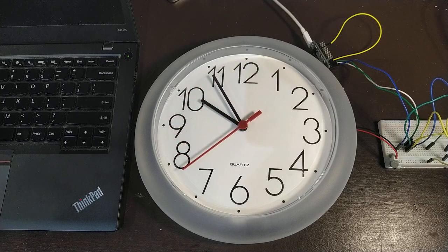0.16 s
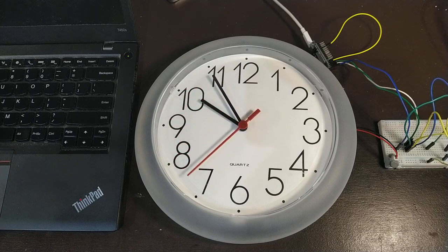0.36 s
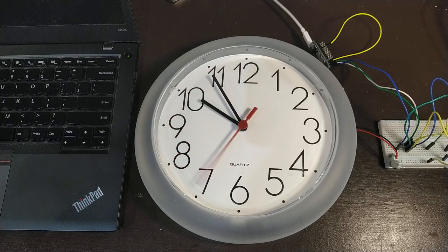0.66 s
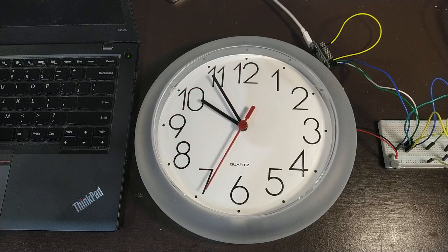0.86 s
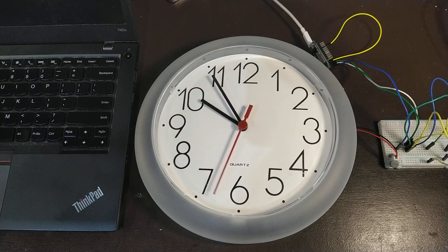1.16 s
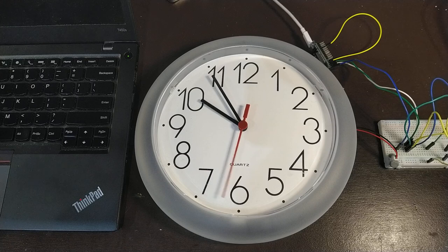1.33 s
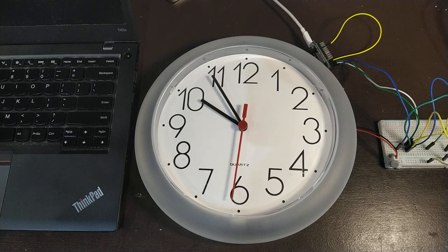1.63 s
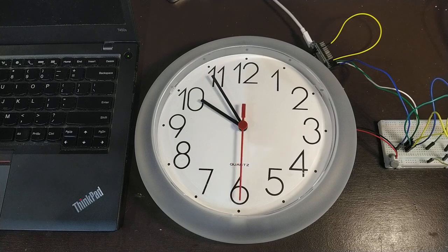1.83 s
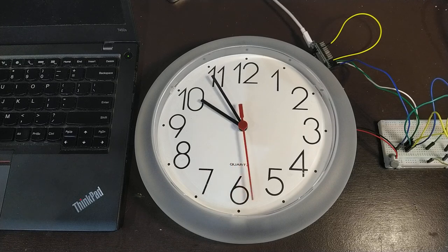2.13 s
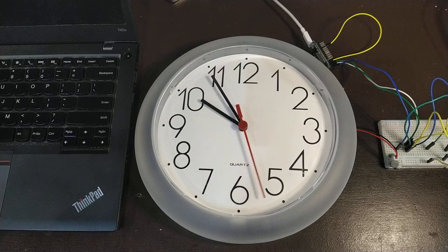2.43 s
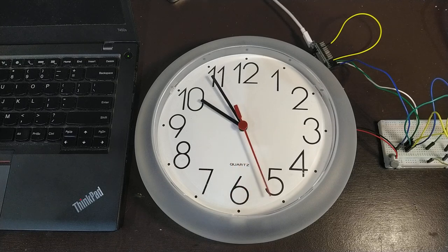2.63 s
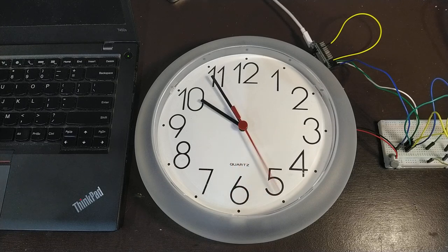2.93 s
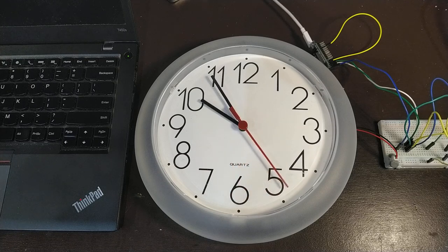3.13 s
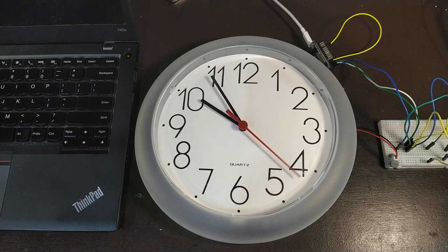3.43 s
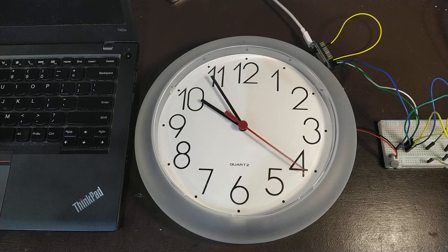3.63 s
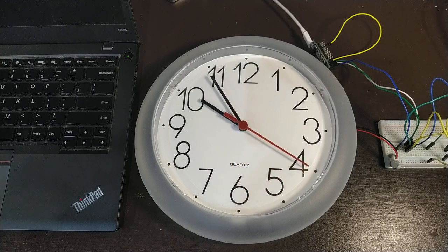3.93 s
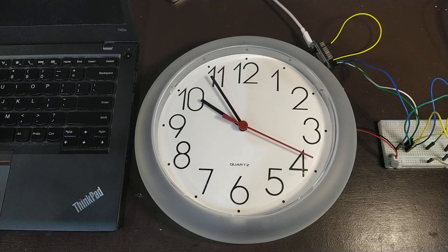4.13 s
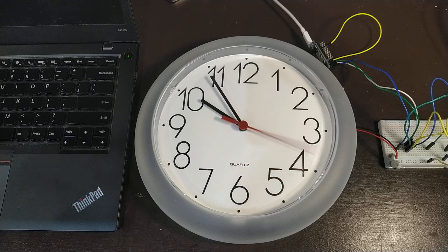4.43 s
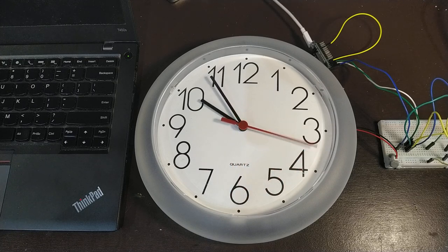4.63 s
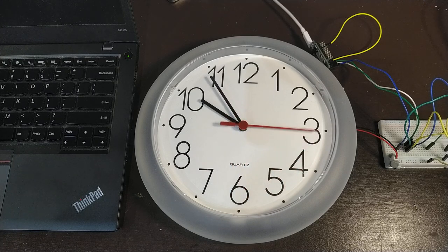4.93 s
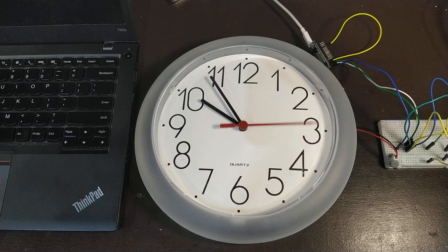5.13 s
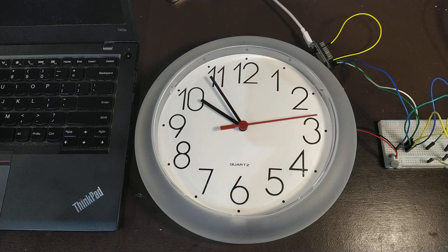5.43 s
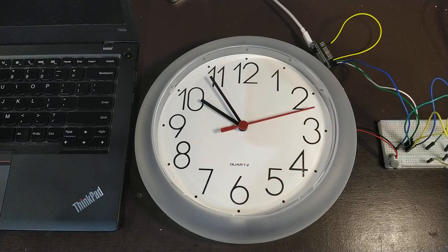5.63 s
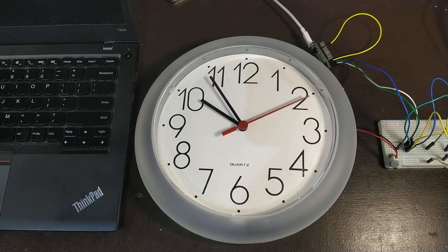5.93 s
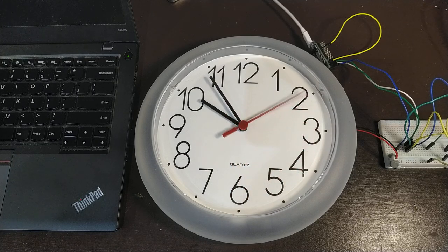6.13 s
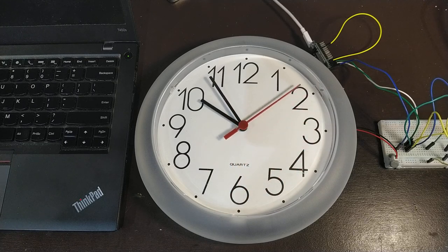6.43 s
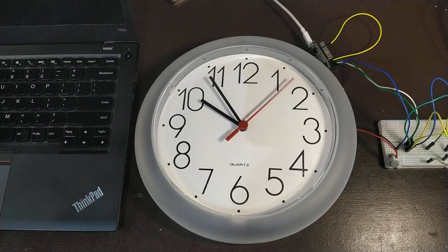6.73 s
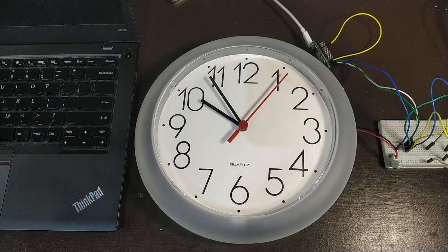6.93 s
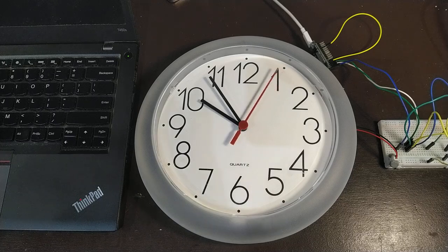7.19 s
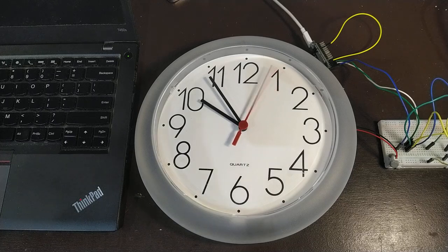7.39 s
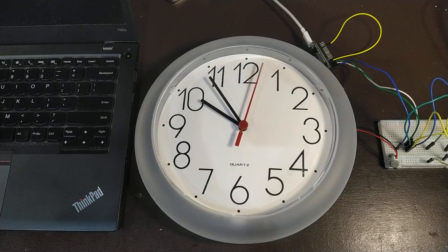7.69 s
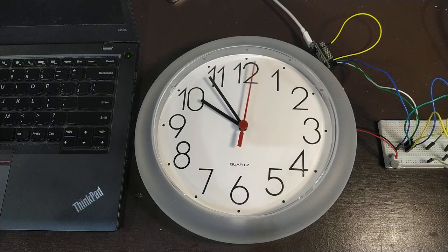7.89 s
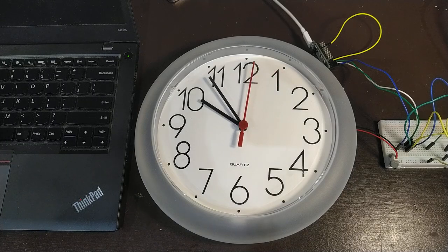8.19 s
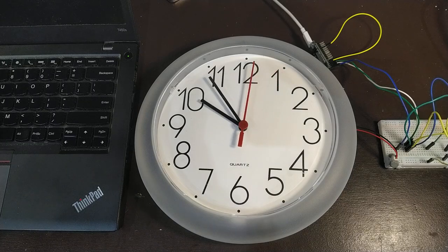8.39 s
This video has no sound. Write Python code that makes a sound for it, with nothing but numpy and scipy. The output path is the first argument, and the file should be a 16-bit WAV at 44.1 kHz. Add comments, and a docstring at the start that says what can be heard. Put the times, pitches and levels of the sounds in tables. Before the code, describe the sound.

A wall clock's motor ticks fast and evenly, nearly five rattly plastic clicks a second, over a low room rumble, then stops just before the end.

```python
"""Quartz wall clock on a desk

The clock lies in a small room; its stepper motor makes nearly five steps a second and stops just before 8 s.
Each step is a volley of clicks: the rotor snaps round, overshoots and rattles the loose plastic gears in the case.
Noise bursts and clumped noise excite resonances of housing, dial and case; short pings are added directly.
Diffuse reverberation follows. Shaped noise makes the low rumble, a hum that swells now and then, and one soft swish;
a faint sine whines throughout."""
import sys
import numpy as np
from scipy import signal
from scipy.fft import rfft, irfft, next_fast_len
from scipy.io import wavfile

SR = 44100
rng = np.random.default_rng(int(sys.argv[2]) if len(sys.argv) > 2 else 0)


def log_audio(samples):
    """Write samples as a 16-bit WAV file to the path given in sys.argv[1]."""
    # one column per channel
    frames = np.atleast_2d(samples).T
    # limit to full scale, then quantise
    limited = np.clip(frames, -1, 1)
    pcm = np.round(limited * 32767).astype(np.int16)
    wavfile.write(sys.argv[1], SR, pcm)


N = 377055

# looseness of the gear train, greatest while the second hand swings down through six: t/s, rattle level/dB
GEAR_SLACK = [(0, -0.5), (1, 0), (1.8, 1), (2.6, -0.5), (3.4, -1.5), (4.4, -1.5), (8, -1.5)]


def amp(db):
    """Level definition: an amplitude ratio is 10 to the power dB/20."""
    return 10 ** (np.asarray(db) / 20)


def unit(x):
    """Normalisation of mean power: scale to rms 1."""
    return x / np.sqrt(np.mean(x ** 2) + 1e-20)


def along(points, hz):
    """Logarithmic frequency scale: read (f/Hz, value) points by straight lines over log frequency."""
    f, value = np.transpose(points)
    return np.interp(np.log(hz + 1), np.log(f), value)


def filtered(x, response):
    """Linear filtering: the spectrum of x is multiplied by a response of frequency."""
    size = next_fast_len(N + SR // 2)  # zero padding keeps the filter's tail from wrapping round
    hz = np.fft.rfftfreq(size, 1 / SR)
    return irfft(rfft(x, size) * response(hz), size)[:N]


def noise(spectrum):
    """Spectral shaping: white noise takes the given spectrum and is scaled to rms 1."""
    white = rng.standard_normal(N)
    return unit(filtered(white, lambda hz: amp(along(spectrum, hz))))


def resonate(x, modes):
    """Modal resonance: steep-sided peaks add in power, with a mean power gain of 1."""
    def response(f):
        power = sum((amp(db) / (1 + (2 * (f - hz) / width) ** 2)) ** 2 for hz, width, db in modes)
        return np.sqrt(power / np.mean(power))
    return filtered(x, response)


def background(rumble_db=-49.0, air_db=-67.5, whine_db=-95.0):
    """Superposition of lasting sources: ventilation rumble, drifting narrow-band hum, thin hiss, electronic whine."""
    # relative spectrum of the rumble: f/Hz, density level/dB
    rumble_spectrum = [(12, 0.5), (28, 1.5), (43, -0.5), (54, -12.5), (78, -5), (100, -12.5), (125, -15.5),
                       (180, -24), (260, -32), (400, -59), (800, -100)]
    # slow change of the rumble: t/s, level/dB
    rumble_swell = [(0, 0), (1.9, 0.5), (2.3, -1), (3.2, 2), (3.7, 0), (5.3, -1), (6.3, 0.1), (8.55, -.3)]
    # the hum's narrow band: f/Hz, width/Hz, relative level/dB
    hum_band = [(147.6, 33, 0)]
    # the hum swells now and then: t/s, level/dB
    hum_drift = [(0, -75.5), (4.2, -70.5), (4.5, -64.5), (4.9, -67.5), (5.1, -78), (8, -72), (8.2, -59.5),
                 (8.35, -75), (8.55, -72)]
    # relative spectrum of the hiss: f/Hz, density level/dB
    air_spectrum = [(120, -23), (200, -8.5), (256, -10), (349, -12.5), (646, -22), (1130, -27),
                    (1610, -32.5), (3760, -36), (4060, -36), (8000, -38.5), (10400, -81), (17600, -120)]
    t = np.arange(N) / SR
    rumble = amp(rumble_db + np.interp(t, *np.transpose(rumble_swell))) * noise(rumble_spectrum)
    hum = amp(np.interp(t, *np.transpose(hum_drift))) * unit(resonate(rng.standard_normal(N), hum_band))
    air = amp(air_db) * noise(air_spectrum)
    whine_hz = 3925
    whine = amp(whine_db) * np.sqrt(2) * np.sin(2 * np.pi * whine_hz * t)  # root 2: the level is an rms level
    return rumble + hum + air + whine


def contacts(count=7):
    """Damped rebound: each step ticks, strikes and rebounds, then swings to rest ever more weakly and unevenly.

    Returns rows of t/s, click level/dB, knock level/dB, the levels still without the clock's gains."""
    # motor steps: strike t/s, rotor's swing to its rebound/s,
    # relative levels of lead-in tick/dB, strike/dB, rebound/dB, knock on the dial/dB
    steps = [(0.053, 0.015, -56.5, -55, -53.5, -53), (0.265, 0.015, -55, -50, -53.5, -53),
             (0.476, 0.017, -59.5, -57, -54, -54.0), (0.699, 0.015, -56, -50, -52, -55),
             (0.897, 0.016, -78, -51.5, -50.5, -54), (1.122, 0.015, -53.5, -48.5, -54, -53.5),
             (1.32, 0.015, -63, -52.5, -49, -54), (1.529, 0.016, -66, -56, -50.5, -54),
             (1.755, 0.016, -55.5, -47.5, -59, -51.5), (1.965, 0.011, -57, -52, -45, -52),
             (2.163, 0.018, -62, -52, -56, -59), (2.386, 0.013, -58.5, -49, -48, -52.0),
             (2.589, 0.012, -68, -52.5, -48, -53.5), (2.792, 0.013, -65, -54, -48.5, -57),
             (3.004, 0.016, -73.5, -53.5, -48.5, -55.5), (3.227, 0.0206, -61, -48.5, -53, -53.5),
             (3.427, 0.014, -81, -53, -50.5, -57.5), (3.653, 0.015, -58, -52, -52.5, -56),
             (3.848, 0.01, -76, -52.5, -54, -56.5), (4.06, 0.015, -65.0, -54, -51, -57),
             (4.27, 0.016, -68.5, -50.5, -57, -57), (4.48, 0.014, -61, -54, -49.5, -57),
             (4.694, 0.015, -58, -51, -53.5, -55.5), (4.903, 0.016, -64, -53.5, -48, -55.5),
             (5.119, 0.015, -61, -52.0, -48, -57), (5.326, 0.0164, -60, -62, -50, -57.5),
             (5.544, 0.014, -60, -49.5, -53, -57), (5.732, 0.015, -79, -55.5, -53, -57.5),
             (5.958, 0.017, -67, -51, -57.5, -55.5), (6.166, 0.016, -64, -51.5, -55.5, -56.5),
             (6.38, 0.017, -69, -49.5, -49, -55.0), (6.591, 0.0162, -57, -55, -50.5, -52.5),
             (6.801, 0.02, -65, -53.0, -52.5, -57), (7.028, 0.017, -52.5, -53.0, -50, -54),
             (7.224, 0.019, -66.0, -49, -56, -54), (7.436, 0.016, -62, -50.0, -53, -55),
             (7.644, 0.016, -75, -48.5, -55, -55.5), (7.846, 0.018, -75, -56, -53, -57.0)]
    # loose gears clack home late after some steps: t/s, relative click level/dB, relative knock level/dB
    clacks = [(0.087, -51.5, -63), (0.124, -54.5, -51.5), (0.294, -50, -55.5), (0.406, -61, -57.5),
              (0.53, -56, -61), (0.567, -57.5, -55), (0.822, -61, -57), (0.962, -54, -56),
              (1.003, -60, -57), (1.207, -57.5, -77), (1.354, -54.5, -58), (1.387, -51, -51),
              (1.554, -47.5, -52.5), (1.656, -59.5, -56.5), (1.808, -49.5, -55.5), (2.028, -55.5, -59),
              (2.188, -45, -50.5), (2.218, -53, -51), (2.267, -60.5, -55), (2.543, -68, -59),
              (2.643, -52, -63), (2.653, -50, -51), (2.819, -58, -50.5), (2.853, -55.5, -55.5),
              (3.251, -55.5, -53.5), (3.338, -58, -58.5), (3.46, -57, -49.5), (3.485, -53, -73),
              (3.781, -64.5, -62.5), (3.91, -51, -54), (4.147, -62, -64), (4.353, -59, -61.5),
              (4.515, -56, -56), (4.748, -55.5, -59), (4.937, -54, -56), (5.15, -51, -52),
              (5.358, -50, -52), (5.435, -65, -57), (5.573, -50.5, -55.5), (5.621, -59, -56),
              (5.763, -51.5, -69), (5.825, -64, -54.5), (6.21, -61, -58), (6.445, -54.5, -62),
              (6.627, -49.5, -53), (6.84, -53, -56), (6.859, -53, -57), (7.066, -62, -64), (7.26, -49, -59),
              (7.361, -63.5, -57), (7.509, -53.5, -53.5), (7.722, -55, -52), (7.877, -51, -52.5),
              (7.892, -52.5, -51), (7.928, -55.5, -51.5)]
    lead_s, lead_knock_db = .018, -13  # the gears take up their play before the strike
    strike_knock_db, rebound_knock_db = 0.5, 0  # these and lead_knock_db are relative to the step's knock
    settle_s, settle_jitter_s = .019, .0035  # spacing of the later swings, and its scatter
    settle_click_db, settle_knock_db = -57.5, -3  # first later swing; its knock is relative to the step's
    click_loss_db, knock_loss_db = 3.0, 2.5  # loss per swing
    click_scatter_db, knock_scatter_db = 2.8, 4.5
    settle_per_slack = 0.53  # slack gears settle louder, dB per dB
    # a random swing this near a listed clack is weakened, so the clack stands in for it
    near_clack_s, near_clack_db = .009, -10

    strike_s, swing_s, lead_in, strike, rebound, knock = np.transpose(steps)
    rows = [(strike_s - lead_s, lead_in, knock + lead_knock_db),
            (strike_s, strike, knock + strike_knock_db),
            (strike_s + swing_s, rebound, knock + rebound_knock_db)]
    chance = rng.standard_normal((len(strike_s), count, 3))
    loose = settle_per_slack * np.interp(strike_s, *np.transpose(GEAR_SLACK))
    clack_s = np.array(clacks)[:, 0]
    at = strike_s + swing_s
    for k in range(count):
        late, harder, deeper = chance[:, k].T
        at = at + settle_s + settle_jitter_s * late
        nearest = np.abs(at[:, None] - clack_s).min(axis=1)
        weakening = near_clack_db * (nearest < near_clack_s)
        click = settle_click_db + loose + weakening - click_loss_db * k + click_scatter_db * harder
        deep = knock + settle_knock_db + weakening - knock_loss_db * k + knock_scatter_db * deeper
        rows.append((at, click, deep))
    return np.vstack([np.hstack(rows).T, clacks])


def place(times, rows):
    """Superposition: sum the rows, each starting at its time."""
    at = np.round(np.abs(times) * SR).astype(int)[:, None] + np.arange(rows.shape[1])
    return np.bincount(at.ravel(), rows.ravel(), N)[:N]


def swell(life, size=4096):
    """Impact envelope: a quick rise that crests after life seconds, then an exponential fall."""
    u = np.arange(size) / SR / life
    return u * u * np.exp(-2 * u)


def scuffs(times, levels_db, life, scatter=.25, tilt_db=2.5, pivot_hz=2500, lean_db=0):
    """Frictional contact: each scuff is a noise burst of tiny impacts, of random length and brightness."""
    length, bright = rng.standard_normal((len(times), 2)).T[:, :, None]
    shape = swell(life * np.exp(scatter * length))
    z = rfft(rng.standard_normal(shape.shape) * shape)
    flat = irfft(z / (np.abs(z) + 1e-12))  # only the phases remain, so every burst is white
    rows = flat * np.sqrt(shape)
    rows *= (amp(levels_db) / np.linalg.norm(rows, axis=1))[:, None]  # level of the energy, before the tilt
    hz = np.fft.rfftfreq(shape.shape[1], 1 / SR)
    octaves = np.clip(np.log2((hz + 1) / pivot_hz), -1, 1)  # the tilt levels off an octave from the pivot
    tilt = amp((lean_db + tilt_db * bright) * octaves)  # both slopes in dB per octave
    return place(times, irfft(rfft(rows) * tilt))


def pings(times, levels_db, pitch_hz, life, scatter):
    """Damped free vibration: the struck gear rings for a few cycles, at a pitch that varies with where it is hit."""
    shape = swell(life)
    hz = pitch_hz * np.exp(scatter * rng.standard_normal((len(times), 1)))
    rows = shape * np.sin(2 * np.pi * hz * np.arange(len(shape)) / SR)
    return place(times, rows * (amp(levels_db) / np.linalg.norm(rows, axis=1))[:, None])


def rattle(times, levels_db, spread, clump_db, clump_rate=220):
    """Random impact excitation: slack parts tremble in clumps that swell and fade around the contacts."""
    at = np.round(np.abs(times) * SR).astype(int)
    power = np.bincount(at, amp(levels_db) ** 2, N)[:N]
    t = np.arange(-SR // 8, SR // 8) / SR
    bell = np.exp(-np.abs(t) / spread)  # spread in seconds, before and after each contact
    motion = np.sqrt(np.abs(signal.fftconvolve(power, bell / bell.sum(), "same")))
    clumps = np.interp(np.arange(N) * clump_rate / SR, np.arange(N), rng.uniform(-1.5, 1, N))
    return motion * unit(rng.standard_normal(N) * amp(clump_db * clumps))


def clock():
    """Source and resonator: contacts click in the housing, rattle the gears, knock the dial, shake the hollow case."""
    # resonances of the movement's plastic housing: f/Hz, width/Hz, relative level/dB
    housing_modes = [(1370, 280, 0), (1748, 247, 1.5), (1867, 170, -6), (2480, 1100, -6.5), (2807, 300, -5),
                     (3114, 293, -1.5), (3647, 270, -5.5), (4300, 2000, -19.5), (5257, 160, -5.5),
                     (5645, 600, -10), (6250, 390, -8.5), (6760, 600, -9), (7324, 290, -10.5),
                     (7760, 520, -12)]
    # resonances of the dial and its cover: f/Hz, width/Hz, relative level/dB
    dial_modes = [(902, 110, -5.5), (1033, 120, -1), (1159, 120, 1), (1241, 60, 0.5), (1341, 88, -2),
                  (1530, 67, -10)]
    # resonances of the hollow case on the desk: f/Hz, width/Hz, relative level/dB
    case_modes = [(291, 40, -1.5), (382.6, 44, -0.5), (440, 92, 2), (512, 84, -2), (606, 220, -3.5),
                  (736, 290, -6.5)]
    click_db, ping_db, rattle_db = 17.5, 14, 16.5  # gains on the click levels
    knock_db, shake_db, boom_db, thud_db = 22.5, 16, 21.0, 17  # gains on the knock levels
    lead, lag, boom_lag = .0025, 0.0059, 0.008  # seconds; scuffs start early so that they crest near the contact
    bright_per_slack = 0.86  # slack gears click brighter, dB per octave per dB

    s, click, knock = contacts().T
    slack = np.interp(s, *np.transpose(GEAR_SLACK))
    teeth = scuffs(s - lead, click + click_db, life=.0035, tilt_db=1.6, pivot_hz=3220,
                   lean_db=bright_per_slack * slack[:, None])
    ring = pings(s - lead / 2, click + ping_db, pitch_hz=1796, life=.0022, scatter=.03)
    gears = rattle(s + lag, click + rattle_db + slack, spread=0.0058, clump_db=8)
    blows = scuffs(s - lead, knock + knock_db, life=0.0072, tilt_db=10, pivot_hz=1150)
    shake = rattle(s + lag, knock + shake_db, spread=0.015, clump_db=4.5)
    # the hollow case booms softly around each contact, a little after it
    boom = rattle(s + boom_lag, knock + boom_db, spread=0.0065, clump_db=4)
    thuds = scuffs(s, knock + thud_db, life=0.0033, tilt_db=5.5, pivot_hz=515)
    housing = resonate(teeth + gears, housing_modes)
    dial = resonate(blows + shake, dial_modes)
    case = resonate(boom + thuds, case_modes)
    return ring + housing + dial + case  # the pings bypass the resonances


def reverb(x, delay=0.0047, size=8192):
    """Diffuse-field decay: the walls answer each stretch of sound with fresh fading noise; the bass lasts longest."""
    # reverberation time of the room: f/Hz, T60/s
    decay_time = [(200, 0.79), (1200, 0.27), (3000, 0.32), (8000, 0.29)]
    wet = np.zeros(N + SR)
    for start in range(0, N, size):
        hz, t, z = signal.stft(rng.standard_normal(SR // 2), SR, nperseg=256)
        fade = amp(-60 * t / along(decay_time, hz)[:, None])
        tail = signal.istft(z * fade, SR, nperseg=256)[1]
        tail = tail * (1 - np.exp(-np.arange(len(tail)) / SR / delay))  # build-up, delay is its time constant
        answer = signal.fftconvolve(x[start:start + size], tail / np.linalg.norm(tail))
        wet[start:start + len(answer)] += answer
    return wet[:N]


def swish():
    """Friction noise: a soft brush past, two bands of noise that start dull and thin into a hiss."""
    # course of the brush: t/s, low rub level/dB, hiss level/dB
    brush_levels = [(6.54, -110, -110), (6.59, -62.5, -68), (6.64, -58, -65), (6.72, -60, -52.5),
                    (6.8, -64.5, -61), (6.87, -62.5, -71.5), (7.081, -80, -68.5), (7.2, -98, -79),
                    (7.35, -110, -110)]
    # relative spectrum of the rub: f/Hz, density level/dB
    rub_spectrum = [(120, -24), (300, 5.5), (600, 2), (1200, 2), (2000, -12), (3200, -11.5), (4500, -15.5),
                    (8000, -41.5)]
    # relative spectrum of the hiss: f/Hz, density level/dB
    hiss_spectrum = [(800, -28.5), (2500, -9.5), (4000, -7), (5000, -5.5), (6200, -1.5), (7400, -0.5),
                     (8200, -6)]
    s, rub_db, hiss_db = np.transpose(brush_levels)
    t = np.arange(N) / SR
    rub = amp(np.interp(t, s, rub_db)) * noise(rub_spectrum)
    hiss = amp(np.interp(t, s, hiss_db)) * noise(hiss_spectrum)
    return rub + hiss


def scene(room_db=-7):
    """Superposition: direct clock, its reverberation, the swish and the background add as one channel."""
    ticks = clock()
    room = amp(room_db) * reverb(ticks)
    return (ticks + room + swish() + background())[None]


def record(dry):
    """Band limitation: in a narrow-band microphone channel the treble rolls off and ends steeply."""
    # treble roll-off: f/Hz, gain level/dB
    treble_gain = [(7650, 0), (7900, -15.5), (8150, -4.5), (8400, -20.5)]
    top_hz = 8419  # nothing passes from here up
    return np.array([filtered(x, lambda hz: amp(along(treble_gain, hz)) * (hz < top_hz)) for x in dry])


dry = scene()
out = record(dry)
log_audio(out)
```